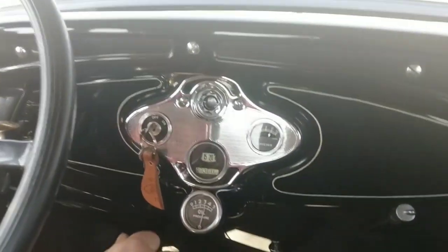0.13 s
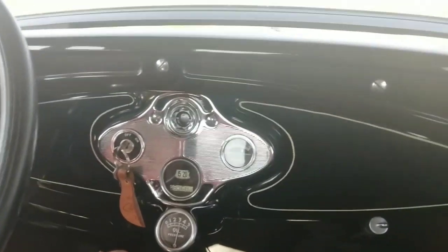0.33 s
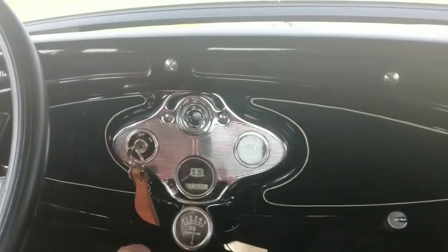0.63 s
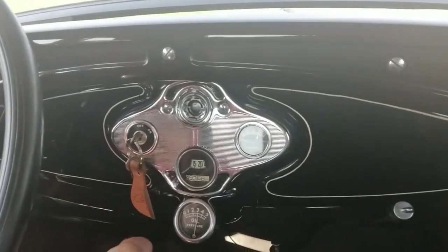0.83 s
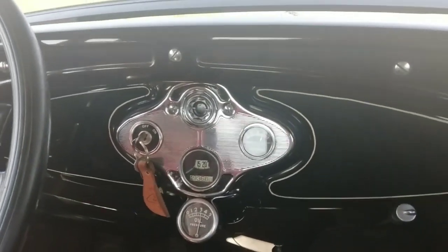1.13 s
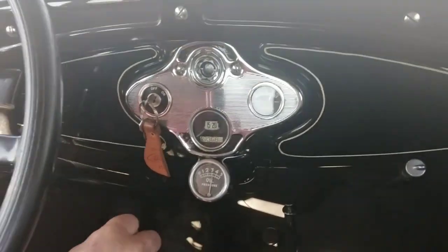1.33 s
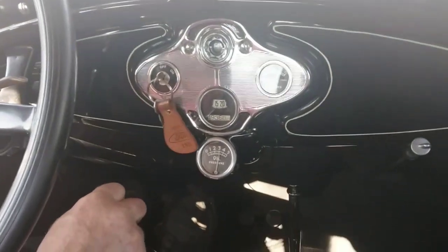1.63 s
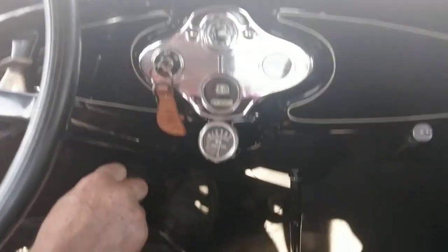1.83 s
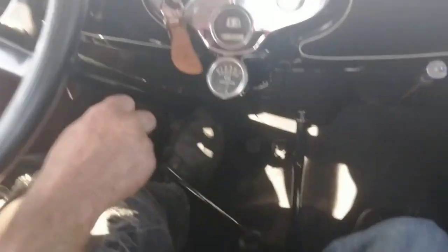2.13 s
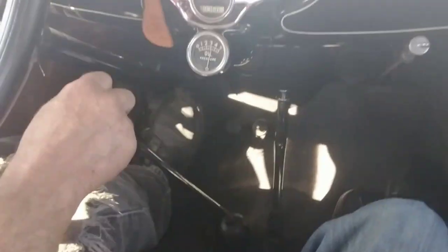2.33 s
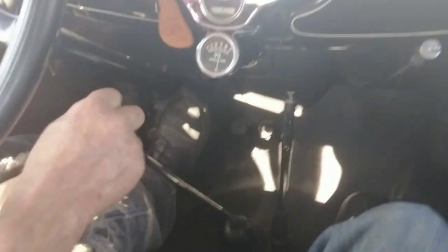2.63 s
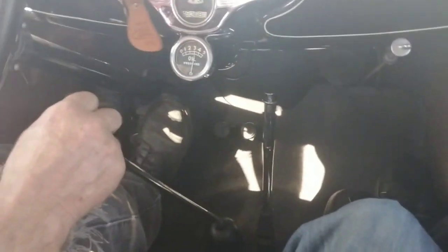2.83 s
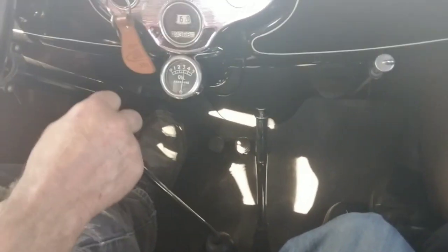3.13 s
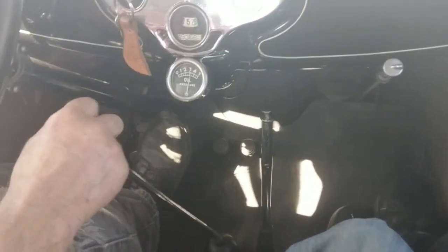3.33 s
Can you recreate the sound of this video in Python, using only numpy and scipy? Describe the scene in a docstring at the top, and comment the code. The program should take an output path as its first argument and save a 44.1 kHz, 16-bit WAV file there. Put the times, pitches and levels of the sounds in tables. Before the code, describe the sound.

An old car's engine booms steadily in its cabin while gear teeth grind twice, the second harder

```python
"""A four-cylinder engine at low speed booms in the body shell of an old car, near a small stereo microphone:
tones at multiples of the firing rate, a drumming panel, noise rumble and a rough mechanical wash.
Twice the gear teeth clash as the lever is pushed towards a gear: gritty noise and tooth blows ring the
gearbox modes. Loose parts tick faintly as puffs of hiss with a short ring; freely turning gears ring dimly."""
import sys
import numpy as np
from scipy import signal
from scipy.fft import rfft, irfft, next_fast_len
from scipy.io import wavfile
from scipy.ndimage import uniform_filter1d, map_coordinates

SR = 44100
rng = np.random.default_rng(int(sys.argv[2]) if len(sys.argv) > 2 else 0)


def transcribe(signal):
    """Save signal, clipped to [-1, 1], as a 16-bit WAV file at the path in sys.argv[1]."""
    frames = np.atleast_2d(signal).T
    limited = np.clip(frames, -1, 1)
    pcm = np.round(limited * 32767).astype(np.int16)
    wavfile.write(sys.argv[1], SR, pcm)


def makeup_ratio(level_db):
    """Linear amplitude ratio for a level in decibels (20 dB per factor of ten)."""
    decades = np.asarray(level_db, float) / 20
    return 10 ** decades


N = 153468  # samples

LOW_LAG_TURNS = 0.064  # low tones reach the right port slightly later


def evened(x):
    """Scales to rms 1."""
    return x / np.sqrt(np.mean(x ** 2) + 1e-20)


def read(points, hz):
    """Table value on a log-frequency axis."""
    f, value = np.transpose(points)
    return np.interp(np.log(hz + 1), np.log(f + 1), value, left=value[0], right=value[-1])


def track(table, off_db=None):
    """Columns of a time table at every sample."""
    rows = np.transpose(table)
    return [np.interp(np.arange(N) / SR, rows[0], c, left=off_db, right=off_db) for c in rows[1:]]


def colour(x, db_of_hz):
    """Filters by a gain in dB given as a function of frequency."""
    size = next_fast_len(N + 4096)
    gain = makeup_ratio(db_of_hz(np.fft.rfftfreq(size, 1 / SR)))
    return irfft(rfft(x, size) * gain, size)[..., :N]


def slow(hz):
    """Slow random wander up to about hz, rms 1."""
    count = int(N / SR * hz * 2) + 3
    points = rng.standard_normal(count)
    return evened(map_coordinates(points, [np.linspace(0, count - 1, N)], order=3))


def ring(x, hz, t60_s):
    """A struck mode: each click starts a dying sine."""
    r = np.exp(-np.log(1000) / (max(t60_s, .005) * SR))
    w = 2 * np.pi * hz / SR
    return signal.lfilter([0, np.sin(w)], [1, -2 * r * np.cos(w), r * r], x) * np.sqrt(1 - r)


def widen(x):
    """The right port lags, up to a quarter turn at wide_hz; a second row, if given, joins its treble."""
    wide_hz, own_share = 1230, 0.84
    size = next_fast_len(N + 4096)
    u = np.clip(np.sqrt(np.fft.rfftfreq(size, 1 / SR) / wide_hz), 0, 1)
    z = rfft(np.atleast_2d(x), size)
    own = own_share * u * (len(z) - 1)
    right = np.sqrt(1 - own ** 2) * z[0] * np.exp(-.5j * np.pi * u ** 2) + own * z[-1]
    return irfft(np.array([z[0], right]), size)[:, :N]


# left-right likeness of the noise: freq_hz, correlation
LIKENESS = [(60, 0.93), (130, 0.65), (290, 0.92), (640, 0.54), (1410, -0.039), (3100, -0.07), (6820, -0.22),
            (15000, 0.05)]


def noise(spectrum, size, flicker_db=0):
    """Stereo noise with drifting patches and level flicker, alike left and right in the bass; mid rms 1."""
    patch_db = 2.5
    hop = size // 4
    frames, hz = N // hop + 5, np.fft.rfftfreq(size, 1 / SR)
    a, b, c, d, patches = rng.standard_normal((frames, len(hz), 5)).T
    patches = uniform_filter1d(patches, size=3, axis=0)
    patches = evened(uniform_filter1d(patches, size=9, axis=1))
    flicker = evened(uniform_filter1d(rng.standard_normal(frames), size=3))
    same = read(LIKENESS, hz)[:, None]
    left = a + 1j * b
    right = same * left + np.sqrt(1 - same ** 2) * (c + 1j * d)
    gain_db = read(spectrum, hz)[:, None] + patch_db * patches + flicker_db * flicker
    z = np.array([left, right]) * makeup_ratio(gain_db)
    out = signal.istft(z, nperseg=size, noverlap=size - hop)[1][:, :N]
    return out / np.sqrt(np.mean(out.mean(0) ** 2))


# boom: start_s, firings_hz, rms_db of the firing order, of its 3rd and of its 4th multiple
ENGINE_BOOM = [(0.0, 24.2, -60, -51, -43), (0.1, 22.85, -15, -14.5, -24), (0.18, 21.96, -33, -61, -50),
               (0.25, 22.5, -11, -14, -41), (0.33, 22.22, -26.5, -25, -33),
               (0.58, 22.71, -16.5, -22.5, -18), (0.66, 23.13, -12.5, -22, -53),
               (0.71, 22.89, -21, -30, -23.5), (0.99, 23.53, -12.5, -22, -18),
               (1.02, 23.77, -12.5, -54, -36), (1.07, 23.91, -12, -26.5, -24.5),
               (1.69, 23.8, -9.5, -23.5, -26), (1.79, 22.86, -13.5, -19.5, -31),
               (1.89, 23.65, -20.5, -26, -22.5), (2.05, 23.8, -8.5, -15.5, -17),
               (2.13, 23.5, -10.5, -18.5, -53), (2.23, 22.98, -41, -31, -29),
               (2.31, 22.95, -16.5, -31, -21), (2.55, 25.5, -14.5, -17, -24.5),
               (2.67, 23.74, -16.5, -19.5, -29), (3.31, 23.5, -12.5, -25, -23.5),
               (3.48, 23.9, -17, -20, -26)]
# weaker multiples of the firing rate: order; and each one's rms_db before the waver
WEAK_ORDERS = (2, 5, 6, 7, 8, 9)
WEAK_RMS_DB = [-29.5, -42, -43, -46.5, -39.5, -45.5]


def boom():
    """A steady-phased firing tone and its multiples, whose phase wavers, the weaker ones also in level."""
    strong_waver_turns, waver_turns, waver_db = 0.07, 0.13, 4.5
    hz, *levels = track(ENGINE_BOOM)
    turns = np.cumsum(hz) / SR
    lag = np.array([[0], [LOW_LAG_TURNS]])
    out = np.zeros((2, N))
    for k, db in zip((1, 3, 4), levels):
        waver = strong_waver_turns * (k > 1) * slow(8)
        out += makeup_ratio(db) * np.cos(2 * np.pi * (k * turns + waver))
    for k, db in zip(WEAK_ORDERS, WEAK_RMS_DB):
        level = makeup_ratio(db + waver_db * slow(6))
        out += level * np.cos(2 * np.pi * (k * turns - lag + waver_turns * slow(5)))
    return np.sqrt(2) * out  # rms to peak


# body panel drumming near one pitch: start_s, mid_rms_db
PANEL_DRUM = [(0.0, -55), (0.27, -25.5), (0.31, -36.5), (0.4, -25.5), (0.55, -28), (0.63, -25),
              (0.72, -33.5), (0.98, -21), (1.03, -33.5), (1.62, -23), (1.69, -30.5), (1.71, -24.5),
              (2.22, -33), (2.73, -22), (2.76, -28), (2.82, -25), (3.44, -34.5), (3.48, -25)]


def drum():
    """A body panel drums: noise through one mode, mostly alike at both ports, its swells evened out."""
    drum_hz, t60_s, same = 190.9, 1.96 / 34, 0.9
    a, b = ring(rng.standard_normal((2, N)), drum_hz, t60_s)
    out = np.array([a, same * a + np.sqrt(1 - same ** 2) * b])
    out /= np.sqrt(uniform_filter1d(out.mean(0) ** 2, size=4000))
    return makeup_ratio(track(PANEL_DRUM)[0]) * out


# spectra, density per Hz: freq_hz, relative_db
RUMBLE_SPECTRUM = [(7.1, -5), (12, -10.5), (38, -3), (90, -4.5), (109, -16.5), (140, -18), (194, -20),
                   (333, -28), (405, -26), (600, -45), (780, -69), (1320, -120)]
WASH_SPECTRUM = [(290, -7), (500, -2.5), (677, -10.5), (771, -1.5), (878, -5.5), (1150, -5.5),
                 (1480, -10.5), (2030, -8), (2750, -15), (5110, -21), (7330, -13.5), (8590, -22.5),
                 (9920, -24), (11800, -36), (15800, -37)]
# wash level, used relative to its mean: start_s, relative_db
WASH_TRACK = [(0.0, -43), (0.39, -43), (0.67, -42), (0.94, -42), (1.76, -42), (2.41, -42.5), (2.57, -38.5),
              (2.89, -42), (3.48, -43)]


def engine():
    """Boom and drumming panel over low rumble and a rough mechanical wash, both shaped noise."""
    rumble_db, wash_db = -18.5, -38
    level, = track(WASH_TRACK)
    rumble = makeup_ratio(rumble_db) * noise(RUMBLE_SPECTRUM, 4096)
    wash = makeup_ratio(wash_db + level - level.mean()) * noise(WASH_SPECTRUM, 512, flicker_db=0.5)
    return boom() + drum() + rumble + wash


# pressure of the teeth on each other: start_s, pressure_db, sharp_db (treble, before sharp_offset_db)
FIRST_PRESSURE = [(0.465, -40, -13), (0.481, -29, -33), (0.507, -19.5, -27), (0.529, -17.5, -19),
                  (0.593, -23, -21.5), (0.615, -27.5, -23), (0.629, -35, -25), (0.653, -48, -10),
                  (0.665, -42, -27), (0.689, -48, -19), (0.711, -27.5, -24), (0.731, -48, -33),
                  (0.735, -35, -30), (0.765, -23, -11), (0.783, -28, -19), (0.817, -34, -20),
                  (0.827, -34, -23), (0.839, -25, -24), (0.875, -52, -27)]
SECOND_PRESSURE = [(2.47, -38.5, -6), (2.51, -15.5, -13), (2.538, -13, -19), (2.548, -12.5, -20),
                   (2.602, -28, -9), (2.616, -21, -18), (2.67, -27.5, -7.5), (2.71, -20, -16),
                   (2.735, -47, -14)]
# per shift: scatter_periods, scraping_share (0-1), thud_db, ring_db
FIRST_TEETH = (.2, 0.39, -12.5, -2)
SECOND_TEETH = (.05, 0.7, -3.5, -2)
# tooth rate: first_hz, second_hz
TOOTH_RATES = (150, 109.5)
# scraping spectra, density per Hz: freq_hz, relative_db
FIRST_SCRAPE = [(180, -35), (350, -26), (700, -10), (1150, -4.5), (2000, -11.5), (3000, -12), (3700, -11),
                (5190, -18.5), (7000, -11), (8500, -22), (9800, -17), (11300, -35), (15800, -37)]
SECOND_SCRAPE = [(180, -28), (450, -11), (640, -20), (950, -12), (1400, -7), (2950, -13), (3700, -18.5),
                 (5190, -23), (7200, -15), (8500, -26), (9800, -24.5), (11300, -42), (15800, -47)]
# gearbox modes: freq_hz, t60_s (in a clash), relative_db in first shift, in second shift, turning freely
GEARBOX = [(436.4, 0.043, -7.5, 0, 0), (531.6, 0.077, -23, -5.5, -11.5), (787.7, 0.1, -10, -3, -5),
           (971.7, 0.13, -13, -1.5, -3), (1126, 0.032, 1.5, -25, -1), (1507, 0.047, -6.5, -7.5, -16.5),
           (1783, 0.033, -3.5, -13, -11), (2064, 0.028, -0.5, -8, -14), (2355, 0.12, -4.5, -21, -12),
           (2890, 0.078, -24, -4.5, -25), (3364, 0.12, -29, -8, -13), (3474, 0.022, -10, -16, -19),
           (6780, 0.018, -20, -7, -39), (6995, 0.043, -2, -2, -10)]
# thud, multiples 1-4 of the tooth rate: relative_db
THUD_ORDERS_DB = [0, 0, -1.5, -3.5]


def clash(pressure, rate_hz, teeth, spectrum, column):
    """Scraping swells at each tooth; it and dull tooth blows drive the gearbox modes; the floor thuds."""
    blow_spread_db, blow_hz = 3.5, 1480
    grit_s, grit_steady = 0.0051, 0.74
    wander_db, wander_hz = 2, 18  # the contact point moves, so each mode swells on its own
    sharp_offset_db = 14
    scatter, share, thud_db, ring_db = teeth

    count = int(N / SR * rate_hz)
    draw = rng.standard_normal((count, 2))
    at = (np.arange(count) + scatter * draw[:, 0]) / rate_hz * SR
    blows = np.zeros(N)
    blows[np.clip(at, 0, N - 1).astype(int)] = makeup_ratio(blow_spread_db * draw[:, 1])
    swell = signal.lfilter([1], [1, -np.exp(-1 / (grit_s * SR))], blows)
    grit = evened((grit_steady + swell) * widen(rng.standard_normal((2, N))))
    dull_blows = colour(evened(widen(blows)), lambda f: -10 * np.log10(1 + (f / blow_hz) ** 4))
    drive = share * grit + (1 - share) * dull_blows

    push_db, sharp_db = (uniform_filter1d(c, size=150) for c in track(pressure, off_db=-61))
    push = makeup_ratio(push_db) * (push_db > -59)  # silent when the teeth are apart

    rings = np.zeros((2, N))
    for k, row in enumerate(GEARBOX):
        level = makeup_ratio(row[column] + wander_db * slow(wander_hz))
        rings += (-1) ** k * level * ring(drive * push, row[0], row[1])
    scale = np.linalg.norm([makeup_ratio(row[column]) for row in GEARBOX]) * np.std(drive) / 2

    scrape = evened(colour(grit, lambda f: read(spectrum, f)))
    dull = signal.sosfiltfilt(signal.butter(3, 8000, fs=SR, output="sos"), scrape)
    scrape = (dull + makeup_ratio(sharp_db + sharp_offset_db) * (scrape - dull)) * push

    turns = rate_hz * np.arange(N) / SR + scatter * slow(30) - np.array([[0], [LOW_LAG_TURNS]])
    thud = sum(makeup_ratio(db) * np.cos(2 * np.pi * (k + 1) * turns + k * k) for k, db in enumerate(THUD_ORDERS_DB))
    return scrape + makeup_ratio(ring_db) * rings / scale + makeup_ratio(thud_db) * thud * push


# loose parts: start_s, level_db (before offset_db), ring_hz, tilt_db_per_decade, ring_db (relative)
LOOSE_PARTS = [(0.0724, -33.5, 2070, -1, -7), (0.1481, -29, 2110, -3, -2.5), (0.3826, -31, 6310, -4, -4),
               (0.4279, -28, 2120, 2, -9), (0.9472, -29.5, 2100, 6, -7), (1.0292, -33, 2080, 6, -5),
               (1.154, -33, 2230, 4, -6), (1.3734, -31, 2120, 6, -8), (1.4519, -30, 2068, 4, -10),
               (1.7949, -30, 2250, 17, -7), (1.8796, -27.5, 1993, 5, -4), (1.905, -26.5, 6780, 9, -10),
               (1.9792, -33, 6690, 4, -4), (2.17, -31, 2570, 20, -7), (2.2996, -25, 4670, 5, -11.5),
               (2.3539, -19.5, 7410, 15, -8.5), (2.3861, -26.5, 2080, 11, -6),
               (2.4094, -26.5, 2040, 11, -6), (2.8349, -27.5, 2061, 15, -8), (2.947, -27.5, 7030, 2, -8),
               (3.1284, -34, 2160, 0, -3), (3.1764, -29.5, 2250, 6, -6), (3.2545, -29, 4525, 11, -7.5),
               (3.3443, -32.5, 2493, 8, -6)]


def ticks():
    """Loose parts: short puffs of hiss with one brief ring, plus a sparse chatter of smaller ones."""
    chatter_per_s, chatter_db, chatter_spread_db, chatter_ring_db = 40, -40.5, 2.5, -4
    offset_db, rise_s, hiss_t60_s, ring_t60_s = 2.5, 0.0025, 0.056, 0.07
    size = 4000
    out, t = np.zeros((2, N + size)), np.arange(size) / SR
    rows = list(LOOSE_PARTS)
    for u, v, w in rng.random((int(chatter_per_s * N / SR), 3)):
        level_db = chatter_db - chatter_spread_db * np.log(v + 0.017)
        rows.append((u * N / SR, level_db, 1500 * 6 ** w, 6, chatter_ring_db))
    f = np.fft.rfftfreq(size, 1 / SR)
    quarter_turn = np.array([[0], [np.pi / 2]])
    for start_s, level_db, hz, tilt_db, ring_db in rows:
        at = min(round(start_s * SR), N - 1)
        tone = makeup_ratio(ring_db - 60 * t / ring_t60_s) * np.sin(2 * np.pi * hz * t + quarter_turn)
        shape = makeup_ratio(read(FIRST_SCRAPE, f) + tilt_db * np.log10(f / 3000 + .01)) * (f > 1000)
        hiss = evened(irfft(rfft(rng.standard_normal((2, size))) * shape))
        puff = tone + .5 * hiss * makeup_ratio(-60 * t / hiss_t60_s)
        out[:, at:at + size] += makeup_ratio(level_db + offset_db) * np.minimum(t / rise_s, 1) * puff
    return out[:, :N]


def free_gears():
    """The turning gears keep the gearbox modes ringing faintly and unevenly, twice as long as in a clash."""
    rms_db, wander_db = -45.5, 4.4
    drive = widen(rng.standard_normal((2, N)))
    rings = sum(makeup_ratio(row[4] + wander_db * slow(5)) * ring(drive, row[0], 2 * row[1]) for row in GEARBOX)
    return makeup_ratio(rms_db) * evened(rings)


def scene():
    """All sources at the two ports."""
    first = clash(FIRST_PRESSURE, TOOTH_RATES[0], FIRST_TEETH, FIRST_SCRAPE, column=2)
    second = clash(SECOND_PRESSURE, TOOTH_RATES[1], SECOND_TEETH, SECOND_SCRAPE, column=3)
    return engine() + first + second + ticks() + free_gears()


# the two microphone ports resonate at different pitches: freq_hz, left_minus_right_db
PORT_RESONANCES = [(60, -.5), (300, 1), (800, 2), (1500, 0.5), (2300, 2.5), (3400, -2), (4500, 1),
                   (5500, 0.5), (7200, 14.5), (8500, -1), (10000, -16), (11500, -12), (13500, 2),
                   (15000, 0)]


def ports(dry):
    """Port resonances share the power between left and right."""
    def power_ratio(f):
        """Left over right."""
        return makeup_ratio(2 * read(PORT_RESONANCES, f))

    left = colour(dry[0], lambda f: 10 * np.log10(2 / (1 + 1 / power_ratio(f))))
    right = colour(dry[1], lambda f: 10 * np.log10(2 / (1 + power_ratio(f))))
    return np.array([left, right])


def low_pass(x):
    """Removes everything above the highest recorded frequency."""
    return signal.sosfilt(signal.butter(12, 15900, fs=SR, output="sos"), x)


def record(dry):
    """Port resonances, soft overload, band limit."""
    knee, edge_hz = 1.64, 15800
    soft = knee * np.tanh(ports(dry) / knee)
    held = colour(soft, lambda f: -80. * (f > edge_hz))
    return low_pass(np.clip(held, -1, 1))


dry = scene()
out = record(dry)
transcribe(out)
```